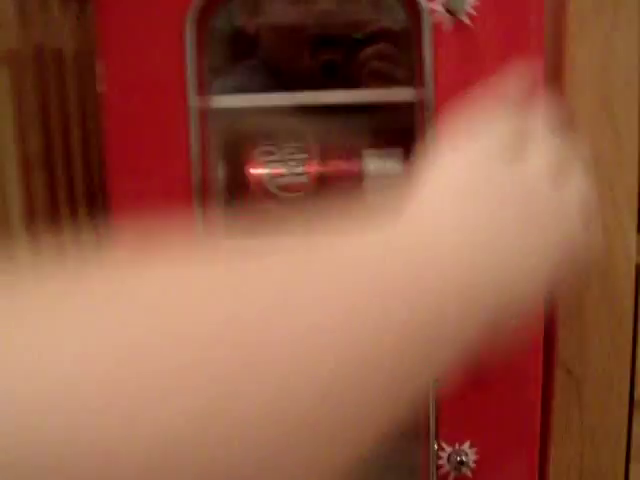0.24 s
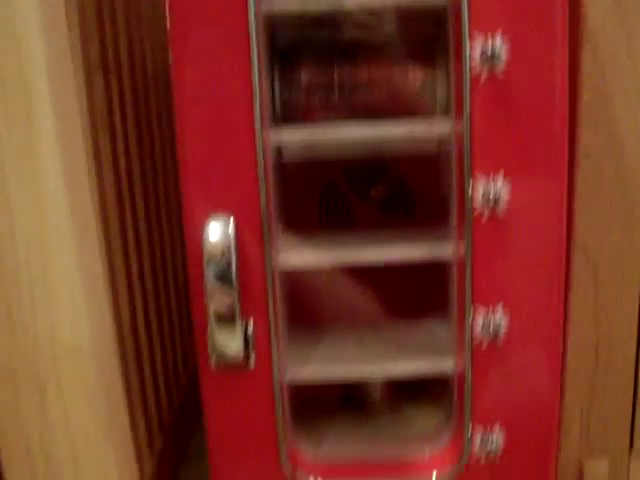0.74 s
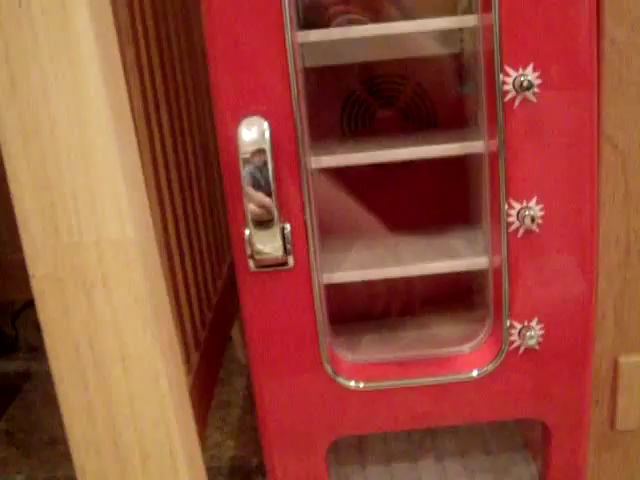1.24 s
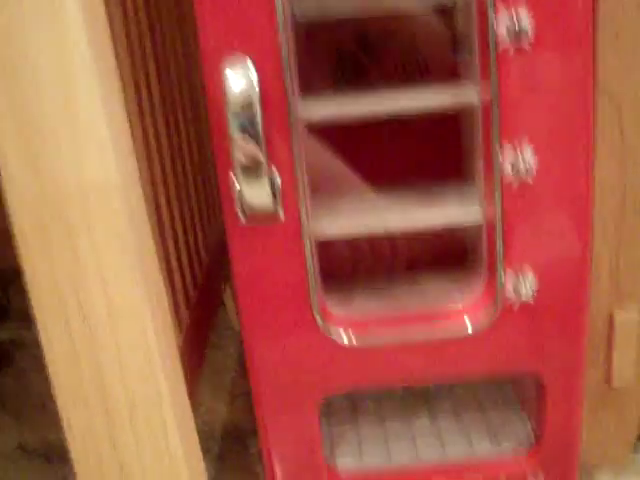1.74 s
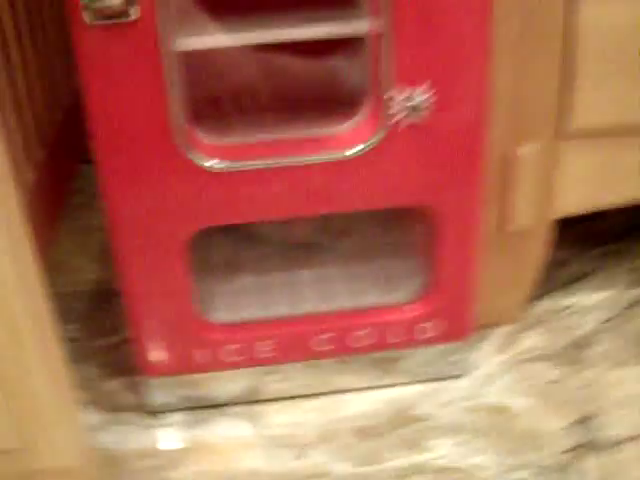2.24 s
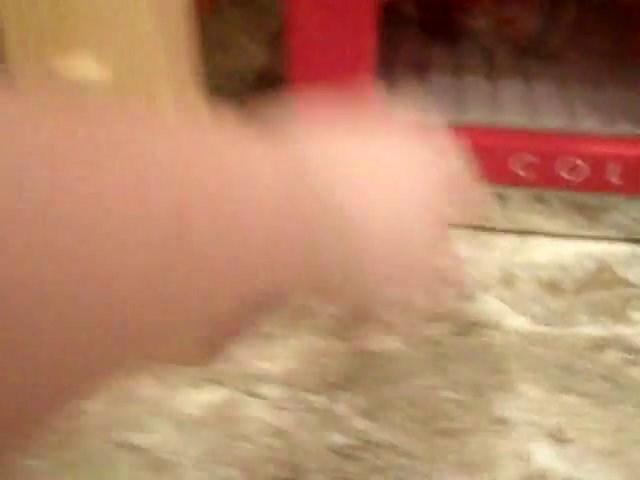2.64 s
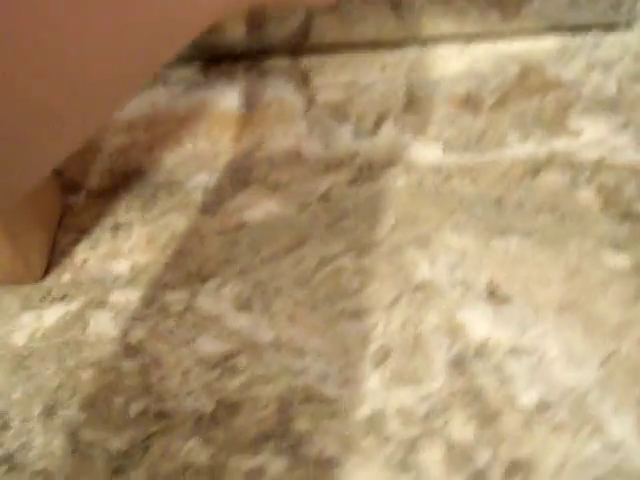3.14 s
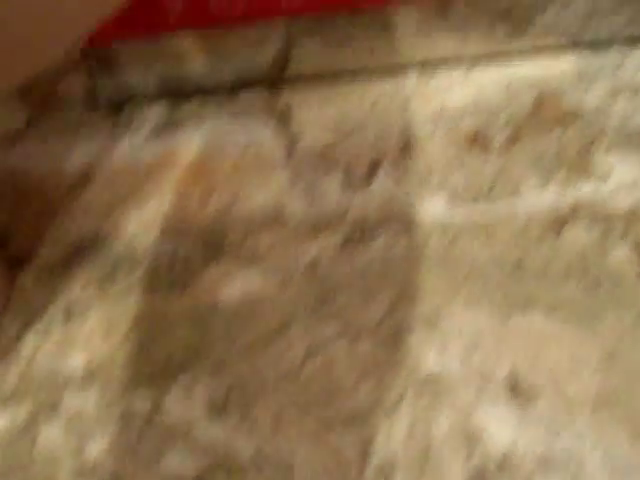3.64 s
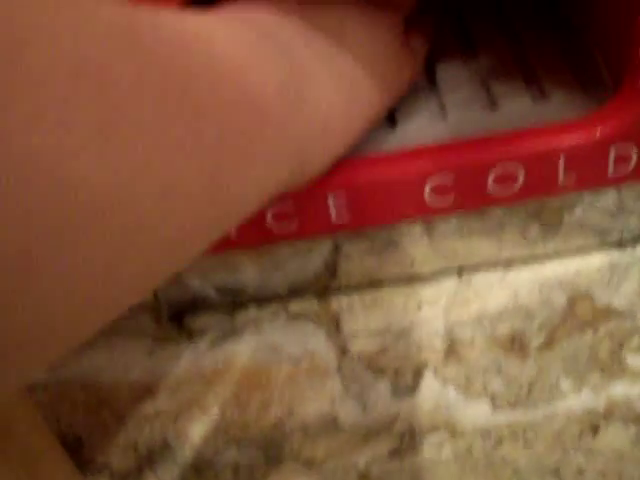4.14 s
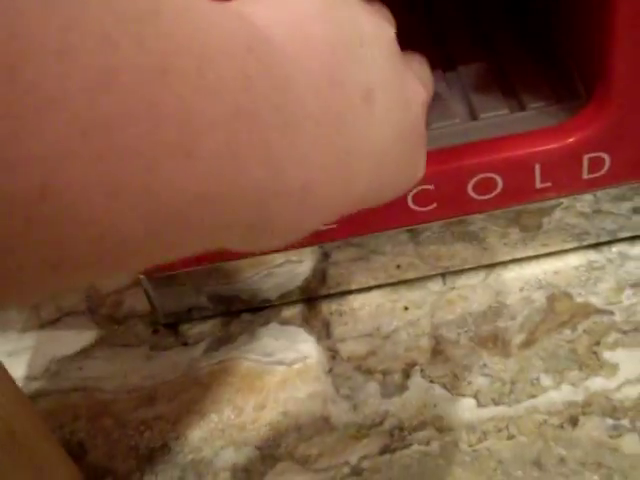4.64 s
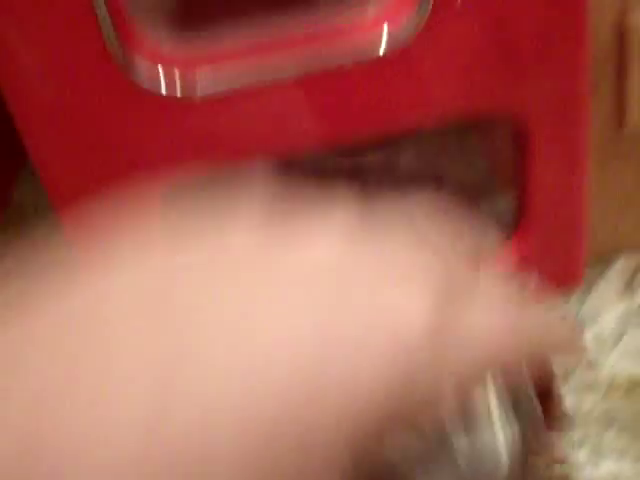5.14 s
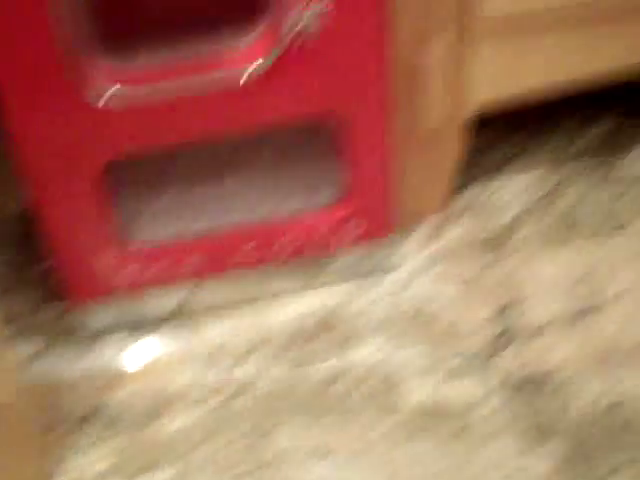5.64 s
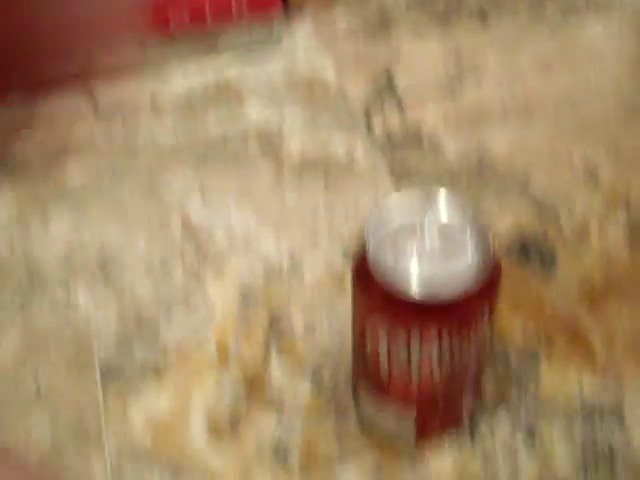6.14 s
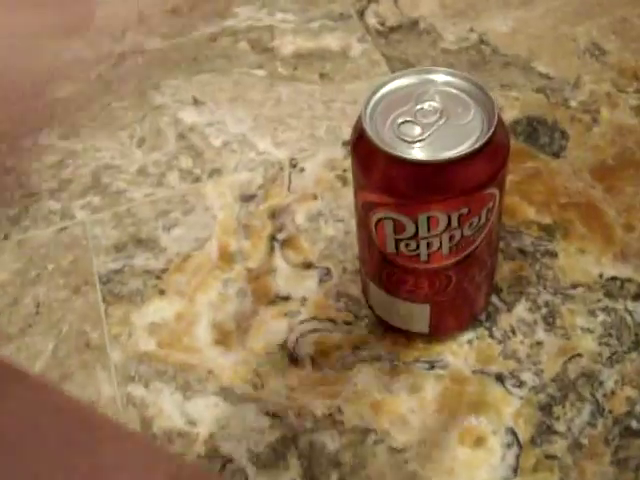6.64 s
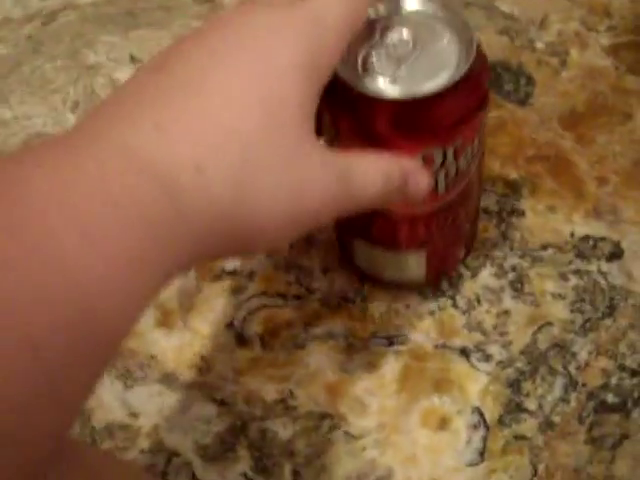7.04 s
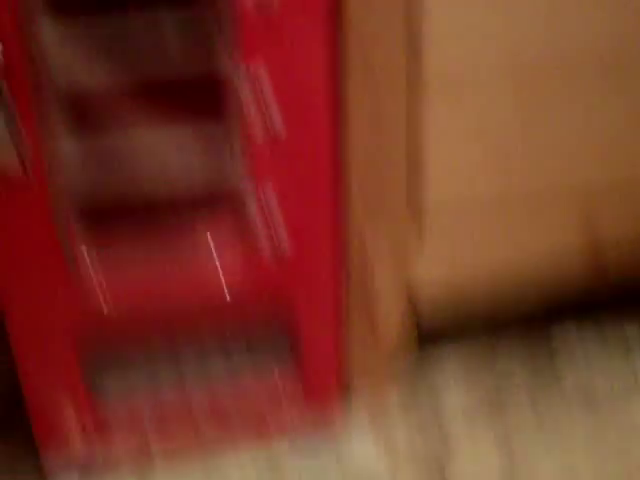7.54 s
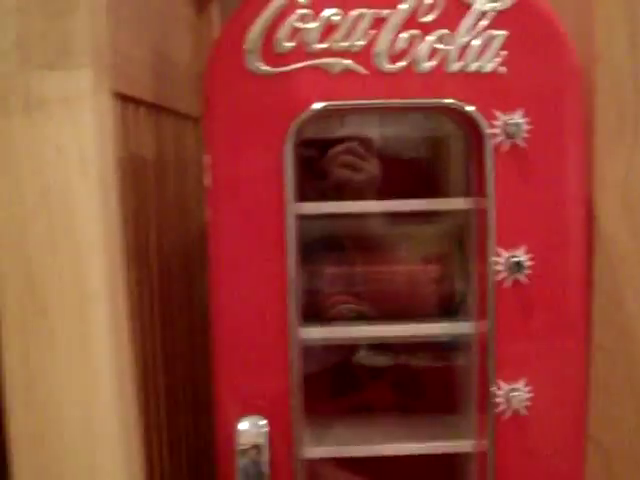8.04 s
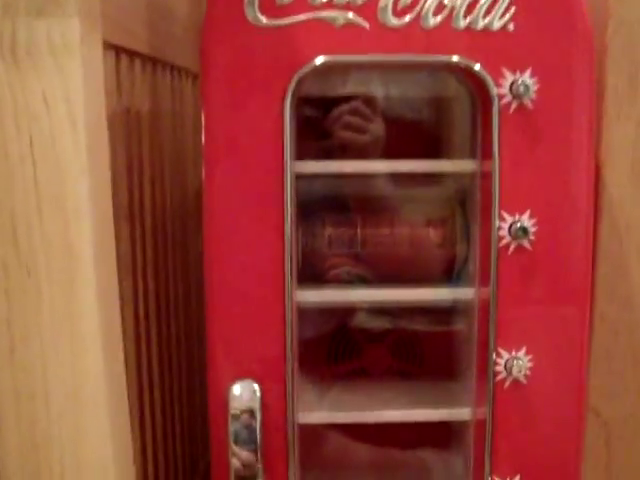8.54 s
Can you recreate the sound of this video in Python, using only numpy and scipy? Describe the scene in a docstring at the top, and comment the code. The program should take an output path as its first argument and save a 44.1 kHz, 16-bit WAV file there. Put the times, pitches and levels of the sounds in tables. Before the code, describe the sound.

Latch snap, heavy double thunk of a full can dropping, plastic fumbling, a flap bang and a metallic clink on a counter over steady fan hum.

```python
"""In a kitchen, a small, narrow-band microphone close to a small vending fridge overloads on the big blows.
A button releases a can: a latch snaps and the can tumbles down in two loud thunks over the hum of the fan.
A hand fumbles in the plastic tray and pulls the can out; the flap bangs shut.
The can is set on a stone counter and later picked up. Blows and rings are struck modes and short noise
bursts; rubbing, cloth and air are coloured noise; the fan hum and finger squeaks are wavering sines."""
import sys
import numpy as np
from scipy import signal
from scipy.fft import rfft, irfft, next_fast_len
from scipy.io import wavfile

SR = 44100
rng = np.random.default_rng(int(sys.argv[2]) if len(sys.argv) > 2 else 0)


def master_out(mix):
    """Clip the mix to full scale and print it as 16-bit PCM to the path in sys.argv[1]."""
    frames = np.transpose(np.atleast_2d(mix))
    ceiling = np.clip(frames, -1, 1)
    pcm = np.round(ceiling * 32767).astype(np.int16)
    wavfile.write(sys.argv[1], SR, pcm)


N = 387947
NOW = np.arange(N) / SR  # seconds through the whole scene
T = np.arange(int(0.7 * SR)) / SR  # seconds after one blow


def amp(db):
    """Decibels to amplitude."""
    return 10 ** (np.asarray(db) / 20)


def unit(x):
    """Scale to rms 1."""
    return x / np.sqrt(np.mean(x ** 2) + 1e-20)


def read(points, hz):
    """Read a curve of (Hz, value) points along a logarithmic frequency axis."""
    f, value = np.transpose(points)
    return np.interp(np.log(hz + 1), np.log(f + 1), value)


def add(mix, s, sound):
    """Lay a sound into the mix from s seconds on."""
    part = mix[round(s * SR):][:len(sound)]
    part += sound[:len(part)]


def noise(colour, size):
    """Noise of rms 1 with the given spectrum."""
    n = next_fast_len(size)
    gain = amp(read(colour, np.fft.rfftfreq(n, 1 / SR)))
    spectrum = rfft(rng.standard_normal(n)) * gain
    return unit(irfft(spectrum, n)[:size])


def wander(rate, size=N):
    """A slow random curve of rms 1, with `rate` knots per second."""
    knots = rng.standard_normal(4000)
    return unit(np.interp(NOW[:size] * rate, np.arange(len(knots)), knots))


def sine(turns):
    """A sine of rms 1 from its running count of turns."""
    return np.sqrt(2) * np.sin(2 * np.pi * turns)


def mode(hz, t60):
    """One struck mode: a sine that falls by 60 dB in t60 seconds."""
    return np.sin(2 * np.pi * hz * T) * amp(-60 * T / t60)


def ring(modes):
    """A struck body: all its modes ring together."""
    return sum(amp(db) * mode(hz, t60) for hz, db, t60 in modes)


def burst(colour, t60, peak_hz=1000, peak_db=0):
    """Many dense modes struck at once: coloured noise that dies quickly, with one spot resonance lifted."""
    hz = np.geomspace(30, 8000, num=200)
    lift = peak_db / (1 + (np.log(hz / peak_hz) / 0.09) ** 2)
    return noise(np.c_[hz, read(colour, hz) + lift], len(T)) * amp(-60 * T / t60)


def strokes(rows, attack, release):
    """Force of strokes: each swells, holds and lets go; attack and release are shares of its length."""
    force = np.zeros(N)
    for s, length, db in rows:
        u = np.linspace(0, 1, round(length * SR))
        shape = np.minimum(np.minimum(u / attack, (1 - u) / release), 1)
        add(force, s, amp(db) * shape)
    return force


def bounces(s, rebounds, gap_s, uneven=0.1553):
    """A hit and its rebounds at slightly uneven gaps, as (number, time)."""
    count = round(abs(rebounds))
    gaps = gap_s * (1 + uneven * rng.uniform(-0.975, 1, count))
    return enumerate(s + np.r_[0, np.cumsum(gaps)])


def contact(rise=0.00079):
    """Yielding surfaces take a moment (time constant in seconds) to pass on the full force."""
    return 1 - np.exp(-T / rise)


# The cooling fan's steady tones. Each row: frequency in Hz, level in dB rms before the flutter.
FAN_TONES = [(44, -62), (177.3, -55), (293.3, -44.5), (313.7, -52.5), (354.7, -76.5), (586.8, -60.5),
             (622, -78.5), (683, -64), (838, -60.5), (1006, -67), (1342, -59)]
# Colour of the fan's rush of air. Each row: frequency in Hz, relative density in dB per Hz.
AIR_COLOUR = [(25, 7), (60, 2), (130, -1), (220, 1.5), (290, 0), (380, -2), (600, -4), (1050, -5.5),
              (1350, -6), (1600, -8), (1800, -4), (2300, -10.5), (3000, -15), (4500, -20.5)]
# Colour of the steady treble hiss. Each row: frequency in Hz, relative density in dB per Hz.
HISS_COLOUR = [(2000, -42), (2800, -6.5), (4000, 7), (5400, 11)]


def fan(waver=0.002495, flutter_db=1.5, air_db=-41.5, hiss_db=-50.5):
    """Slightly wavering blade and motor tones in a steady rush of air."""
    turns_per_hz = np.cumsum(1 + waver * wander(6)) / SR  # all tones waver together
    tones = np.zeros(N)
    for hz, db in FAN_TONES:
        level = amp(db + flutter_db * wander(3.8))
        tones += level * sine(hz * turns_per_hz + rng.random())
    return tones + amp(air_db) * noise(AIR_COLOUR, N) + amp(hiss_db) * noise(HISS_COLOUR, N)


# The kitchen's echo. Each row: band centre in Hz, t60 in seconds, level in dB.
KITCHEN_ECHO = [(70, 0.66, -18.5), (200, 0.39, -10), (600, 0.46, -11), (1500, 0.34, -10), (3020, 0.41, -11),
                (5000, .38, -14)]


def kitchen(x, build=0.013, taps_per_s=3000):
    """Dense reflections off counter and cupboards, each band dying at its own speed."""
    taps = rfft(rng.standard_normal(len(T)) * (rng.random(len(T)) < taps_per_s / SR))
    hz = np.fft.rfftfreq(len(T), 1 / SR)
    centres = [row[0] for row in KITCHEN_ECHO]
    echo = np.zeros(len(T))
    for share, (_, t60, db) in zip(np.eye(len(KITCHEN_ECHO)), KITCHEN_ECHO):
        fade = amp(-60 * T / t60) * (1 - np.exp(-T / build))
        band = irfft(taps * read(np.c_[centres, share], hz), len(T))
        echo += amp(db) * band * fade / np.linalg.norm(irfft(taps, len(T)) * fade)
    return x + signal.fftconvolve(x, echo)[:N]


# Colour of rubbing on plastic. Each row: frequency in Hz, relative density in dB per Hz.
PLASTIC_COLOUR = [(40, -4.5), (90, 2.5), (200, 2.5), (500, -1), (1200, -4.5), (2400, -11), (4000, -13),
                  (5400, -18)]
# Soft bumps on the microphone's housing. Each row: time in seconds, pitch in Hz, level in dB.
MIC_BUMPS = [(6.261, 58, -23), (6.277, 70.4, -16), (6.3085, 61, -0.5), (6.508, 75, -24)]


def handling(t60=0.07, rub_db=-27, rub_t60=0.09):
    """Bumps reach the microphone through its housing as a few slow swings with a faint rub."""
    out = np.zeros(N)
    for s, hz, db in MIC_BUMPS:
        rub = amp(rub_db) * burst(PLASTIC_COLOUR, rub_t60)
        add(out, s, amp(db) * (rub - mode(hz, t60)))
    return out


# The sleeve brushing along with each move of the arm. Each row: start and length in seconds, level in dB.
SLEEVE_STROKES = [(0.05, 0.17, -48), (2.17, 0.62, -40), (2.38, 0.14, -46), (2.82, 0.76, -39.5),
                  (4.15, 0.91, -40.5), (5.1, 0.95, -49), (5.88, 0.67, -42), (6.72, 0.28, -44.5),
                  (7.2, 0.98, -50.5)]
# Colour of the cloth. Each row: frequency in Hz, relative density in dB per Hz.
CLOTH_COLOUR = [(300, -23), (1200, -16), (2500, -3.5), (3800, -1.5), (4600, 1.5), (5400, -0.5)]


def sleeve(grain_db=2.0, sway_db=3.5):
    """Cloth brushes smoothly: bright noise that swells with each stroke and sways a little."""
    force = strokes(SLEEVE_STROKES, attack=0.14, release=0.18)
    texture = amp(sway_db * wander(20) + grain_db * wander(60))
    return force * texture * noise(CLOTH_COLOUR, N)


# Button, can and hand sliding on plastic. Each row: start and length in seconds, level in dB.
PLASTIC_SLIDES = [(0.065, 0.12, -32.5), (0.277, 0.086, -18), (0.54, 0.2, -15.5), (0.76, 0.47, -41.5),
                  (1.35, 0.26, -40), (2.86, 3.35, -36), (4.74, 0.22, -32), (5.034, 0.049, -22)]


def sliding(slip_db=2.5, grain_db=1.5, lead_s=0.014, swell_s=0.057, swell_db=-19):
    """Sliding on plastic sticks and slips, and a soft swell of noise surrounds every listed knock in the tray."""
    slides = strokes(PLASTIC_SLIDES, attack=0.14, release=0.76)
    swell_rows = [(s - lead_s, swell_s, db + swell_db) for s, db, *_ in TRAY_KNOCKS]
    swells = strokes(swell_rows, attack=0.14, release=0.86)
    force = np.hypot(slides, swells)
    texture = amp(slip_db * wander(35) + grain_db * wander(300))
    return force * texture * noise(PLASTIC_COLOUR, N)


# Fingertips slipping with a squeak. Each row: start and length in seconds, pitch in Hz, level in dB.
FINGER_SQUEAKS = [(2.918, 0.046, 2250, -35), (4.444, 0.034, 4720, -38), (7.059, 0.0058, 2910, -14.5)]


def squeaks(jitter=0.021):
    """Skin sticks and slips at an unsteady pitch."""
    out = np.zeros(N)
    for s, length, hz, db in FINGER_SQUEAKS:
        swell = np.hanning(round(length * SR))
        turns = np.cumsum(hz * (1 + jitter * wander(350)[:len(swell)])) / SR
        add(out, s, amp(db) * swell * sine(turns))
    return out


# Modes of the full can, not held. Each row: frequency in Hz, level in dB, t60 in seconds.
CAN_MODES = [(392, -27, 0.058), (451, -20, 0.085), (1263, -4.5, 0.13), (1254, -29.5, 0.26),
             (2092, -16.5, 0.11), (2260, -19, 0.17), (2400, -27, 0.17), (2766, -17.5, 0.11),
             (2620, -33, 0.5), (3060, -38, 0.11), (3960, -25, 0.17), (4700, -22, 0.04)]


def held_can(grip, grip_pitch=0.116, grip_damping=0.39):
    """A tight grip (0-1) raises and damps the can's modes."""
    pitch = 1 + grip_pitch * grip
    damping = 1 + grip_damping * grip
    return [(hz * pitch, db, t60 / damping) for hz, db, t60 in CAN_MODES]


# The gripped can dragging over the stone. Each row: start and length in seconds, level in dB.
STONE_DRAGS = [(7.008, 0.038, -33.5), (7.042, 0.0099, -28), (7.063, 0.056, -38), (7.155, 0.045, -36),
               (7.243, 0.046, -33), (7.318, 0.089, -26)]
# Colour of the can's rim scraping. Each row: frequency in Hz, relative density in dB per Hz.
RIM_COLOUR = [(300, -49), (900, -12.5), (1350, -15), (1800, -9), (2150, -9.5), (2850, 2), (3800, -3.5),
              (4300, -28.5), (4900, -5.5), (5400, -18)]


def can_dragged(slip_db=4.0, ring_db=-3, scrape_db=-2, grind_db=-10):
    """The rim sticks and slips on the stone; the slips hiss, grind and keep the can ringing."""
    force = strokes(STONE_DRAGS, attack=0.084, release=0.45) * amp(slip_db * wander(250))
    body = ring(held_can(1.0))
    ringing = signal.fftconvolve(force * rng.standard_normal(N), body / np.linalg.norm(body))[:N]
    scrape = noise(RIM_COLOUR, N)
    grind = noise([(200, -36.5), (350, -6), (420, -6.5), (560, -17), (1000, -33)], N)  # (Hz, dB per Hz)
    return force * (amp(scrape_db) * scrape + amp(grind_db) * grind) + amp(ring_db) * ringing


# Dull colour of a blow. Each row: frequency in Hz, relative density in dB per Hz.
CLACK_COLOUR = [(120, -12.5), (300, 5), (480, -0.5), (720, -1), (1000, -4.5), (1500, -10.5), (2200, -15),
                (5000, -44.5)]
# The can's rim touching stone. Each row: time in seconds, ring level in dB, scrape level in dB,
# grip from 0 to 1, rebounds (sign ignored, rounded to a whole number).
STONE_CLINKS = [(5.5523, 2.5, -7, 0, 1), (5.577, -7, -10.5, 0.12, 2.5), (7.044, -47, -24, 0.65, 0.5),
                (7.246, -22, -29.5, 0.94, -0.5), (7.327, -23.5, -27, 0.8, 0.5),
                (7.339, -14, -10.5, 0.78, 2)]


def can_on_stone(gap_s=0.013, ring_loss_db=9, scrape_loss_db=3, scrape_t60=0.048, tick_db=-12, tick_t60=0.027):
    """The rim lands and chatters: dull tick, bright scrape and the full can's short ring, fading by rebound."""
    out = np.zeros(N)
    for start, ring_db, scrape_db, grip, rebounds in STONE_CLINKS:
        for k, s in bounces(start, rebounds, gap_s):
            body = ring(held_can(grip)) + amp(tick_db) * burst(CLACK_COLOUR, tick_t60)
            scrape = burst(RIM_COLOUR, scrape_t60)
            add(out, s, amp(ring_db - k * ring_loss_db) * body + amp(scrape_db - k * scrape_loss_db) * scrape)
    return out


# Bright colour of a hard blow on plastic. Each row: frequency in Hz, relative density in dB per Hz.
SNAP_COLOUR = [(800, -19), (1500, 0), (2000, -1), (2700, 0.5), (3900, -5), (4500, -5), (5300, -6)]
# thud_t60 holds at the usual pitch; higher thuds die sooner, by this power of the pitch ratio
THUD_HZ, THUD_DAMPING = 160, 0.19


def blows(rows, modes, gap_s, loss_db, soften_db, focus_db, thud_t60, thud_db, panel_db,
          clack_t60, clack_db, spot_db, snap_t60, snap_db, rattle_db):
    """Each blow pushes the wall it hits, rings the modes near its pitch, and makes loose plastic clack and rattle.
    A hard contact trades thud for snap; each rebound loses loss_db of level and soften_db of hardness."""
    out = np.zeros(N)
    onset = contact()
    rings = np.array([amp(db) * mode(f, t60) for f, db, t60 in modes])
    mode_hz = np.array(modes)[:, 0]
    for start, level, hardness, hz, clack_hz, rebounds in rows:
        reach = amp(panel_db - focus_db * abs(np.log2(mode_hz / hz)))  # focus in dB per octave
        push_t60 = thud_t60 * (THUD_HZ / hz) ** THUD_DAMPING
        for k, s in bounces(start, rebounds, gap_s):
            hard = hardness - k * soften_db
            panels = (rng.choice([-1, 1], len(modes)) * reach) @ rings
            thud = panels - amp(thud_db) * mode(hz, push_t60)
            clack = amp(clack_db) * burst(CLACK_COLOUR, clack_t60, clack_hz, spot_db)
            snap = amp(snap_db) * burst(SNAP_COLOUR, snap_t60, clack_hz, spot_db)
            rattle = amp(rattle_db * wander(234, len(T)))
            blow = amp(-hard) * thud + rattle * (clack + amp(hard) * snap)
            add(out, s, amp(level - k * loss_db) * onset * blow)
    return out


def fumbling(count=12, from_s=3.0, to_s=5.05, level_db=-34.5, hardness_db=0.5,
             thud_hz=110, clack_hz=1100, pitch_spread=0.49):
    """Light touches at random times and pitches while the hand gropes about, as rows like the tray's knocks."""
    times = from_s + (to_s - from_s) * (np.arange(count) + rng.random(count)) / count
    pitches = np.exp(pitch_spread * rng.standard_normal(count))
    return [(s, level_db, hardness_db, thud_hz * pitch, clack_hz * pitch, 0) for s, pitch in zip(times, pitches)]


# Hand, can and flap knocking in the tray. Each row: start in seconds, level in dB, hardness in dB,
# thud pitch in Hz, clack pitch in Hz, rebounds (rounded to a whole number).
TRAY_KNOCKS = [(2.875, -20.5, -0.5, 196, 500, 0), (2.889, -26.5, -3.5, 78.6, 530, 0),
               (2.992, -24.5, -2, 176.5, 503, 0), (3.07, -43.5, 16, 312, 3900, 0),
               (3.322, -31.5, -4, 177, 464, 0), (3.438, -17, 2, 220, 1150, 0), (3.64, -29, 0, 81, 980, 0),
               (3.694, -25.5, 2, 175, 1200, 0), (3.745, -18, 5, 103, 710, 0),
               (3.821, -20.5, -3.5, 743, 960, 0), (3.928, -17.5, -2, 70, 800, 0),
               (3.957, -27, -9, 191, 480, 0), (4.073, -19, -2, 68, 447, 0),
               (4.488, -20.5, -1.5, 272, 930, 0), (4.548, -20.5, 4.5, 73.4, 2300, 1),
               (4.604, -16.5, 1, 66.6, 664, 0), (4.681, -16.5, -3, 82, 844, 0),
               (4.786, -13, 4, 120, 730, 0), (4.985, -29.5, -5, 69.6, 1430, 1),
               (5.057, -10, -1, 400, 416, 0), (5.105, -9, -1.5, 163, 416, 0),
               (5.113, -6.5, 5, 298.4, 964, 0), (5.125, -6, -1.5, 48.4, 563, 0),
               (5.148, -14.5, -8, 172, 470, 1), (5.454, -41.5, 15.5, 188, 3900, 0)]
# Modes of the plastic tray. Each row: frequency in Hz, relative level in dB, t60 in seconds.
TRAY_BODY = [(68.3, -2, 0.28), (114.7, -5.5, 0.21), (174.2, -2, 0.12), (212.3, -4, 0.091),
             (283, -6.5, 0.11), (331, -5.5, 0.091), (397, -9.5, 0.067), (502, -11.5, 0.067),
             (714, -17.5, 0.031), (770, -17.5, 0.03)]


def tray_knocks():
    """Knocks and light touches ring the plastic tray, with short clacks and snaps."""
    return blows(TRAY_KNOCKS + fumbling(), TRAY_BODY, gap_s=0.018, loss_db=5.5, soften_db=0, focus_db=2.0,
                 thud_t60=0.099, thud_db=7.5, panel_db=1.85, clack_t60=0.065, clack_db=2, spot_db=9.0,
                 snap_t60=0.033, snap_db=3.1, rattle_db=1.5)


# The latch snapping and the can falling through the cabinet. Each row: start in seconds, level in dB,
# hardness in dB, thud pitch in Hz, clack pitch in Hz, rebounds (rounded to a whole number).
LATCH_AND_FALL = [(0.224, -32, -4.5, 122, 706, 0), (0.294, -13, 16, 270, 1510, 0),
                  (0.377, -14, -3.5, 181.5, 460, 0.5), (0.461, -1, -0.5, 275, 565, 1.46),
                  (0.528, 2, 2, 116, 500, 2), (0.566, -6, 1.5, 73.5, 530, 1),
                  (0.6, -14.5, -3.5, 238, 790, 1), (0.648, -4.5, 0.5, 202, 450, 0.47),
                  (0.726, -10.5, 2.5, 178, 430, 0.44), (0.775, -20.5, -2.5, 160, 474, 1),
                  (1.136, -33.5, -5.5, 176, 450, 0), (1.191, -21.5, 0, 79, 1200, 0.15),
                  (1.234, -26.5, -13, 277, 444, 0.015), (1.261, 0, 4.5, 176.1, 480, 0.89),
                  (1.322, -12, -2.5, 195.5, 520, 1.55), (1.428, -25, -1, 115, 480, 0.25)]
# Modes of the cabinet panels. Each row: frequency in Hz, relative level in dB, t60 in seconds.
CABINET_PANELS = [(69.1, -9.5, 0.59), (116.4, 0, 0.25), (173.2, 1.5, 0.18), (236, -2, 0.11),
                  (279.3, -3, 0.2), (340, -14, 0.21), (384.7, -16.5, 0.25), (455, -7.5, 0.23),
                  (517, -15, 0.24), (615, -12, 0.15), (760, -15, 0.24), (857, -17, 0.38)]


def latch_and_can_drop():
    """The latch and the falling can strike the cabinet, whose panels boom while loose plastic rattles."""
    return blows(LATCH_AND_FALL, CABINET_PANELS, gap_s=0.0185, loss_db=4, soften_db=0.9, focus_db=3,
                 thud_t60=0.12, thud_db=3, panel_db=-0.5, clack_t60=0.1, clack_db=1, spot_db=5.5,
                 snap_t60=0.094, snap_db=-7, rattle_db=1.0)


def radiate(x, low_hz=38):
    """A small box radiates little deep bass."""
    return signal.sosfilt(signal.butter(2, low_hz, "high", fs=SR, output="sos"), x)


def scene():
    """Fridge, can and hand sound into the kitchen; the fan runs throughout."""
    fridge = radiate(latch_and_can_drop() + tray_knocks())
    can = can_on_stone() + can_dragged()
    hand = squeaks() + sleeve() + sliding()
    return (kitchen(fridge + can + hand) + handling() + fan())[None]


def record(dry, notch_hz=3390, notch_width_hz=260, low_hz=22, band_hz=5430, edge_hz=16500):
    """A narrow-band microphone with a deep notch in the treble; loud peaks flatten at full scale."""
    n = next_fast_len(N + len(T))
    hz = np.fft.rfftfreq(n, 1 / SR)
    notch = (1 - np.exp(-((hz - notch_hz) / notch_width_hz) ** 2)) ** 3
    bass_cut = 1j * hz / (1j * hz + low_hz)
    treble_cut = 1 / (1 + (hz / band_hz) ** 70) ** 3
    x = irfft(rfft(dry, n) * notch * bass_cut * treble_cut, n)[:, :N]
    clipped = x / (1 + abs(x) ** 16) ** (1 / 16)
    # a last low-pass limits the overtones that clipping adds
    lowpass = signal.firwin(255, edge_hz, window=("kaiser", 9), fs=SR)
    return signal.oaconvolve(clipped, lowpass[None], "same")


dry = scene()
out = record(dry)
master_out(out)
```